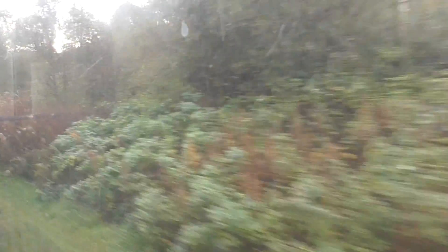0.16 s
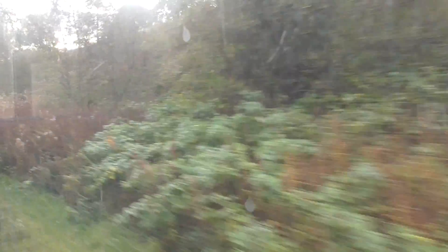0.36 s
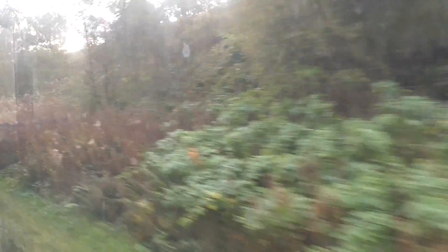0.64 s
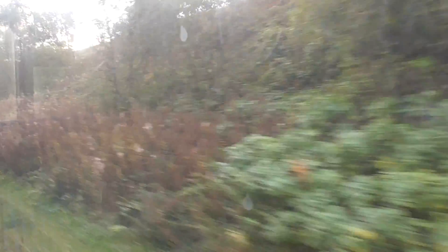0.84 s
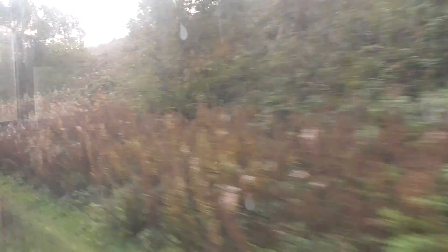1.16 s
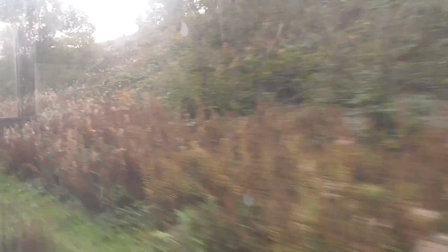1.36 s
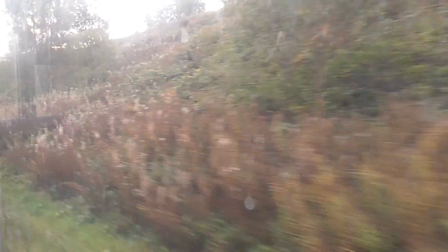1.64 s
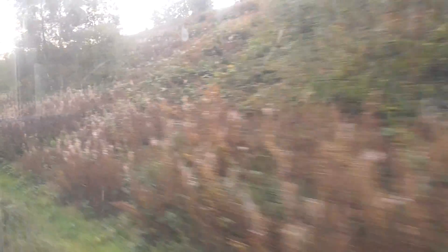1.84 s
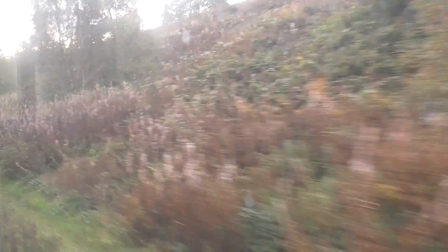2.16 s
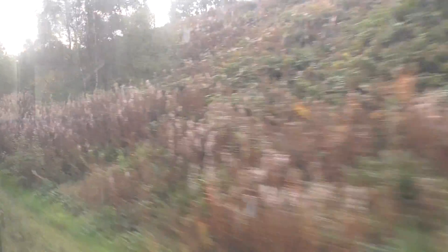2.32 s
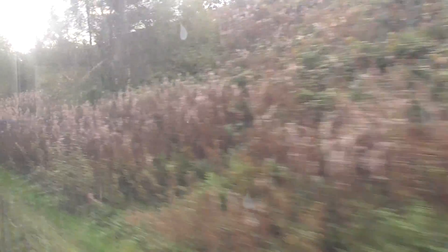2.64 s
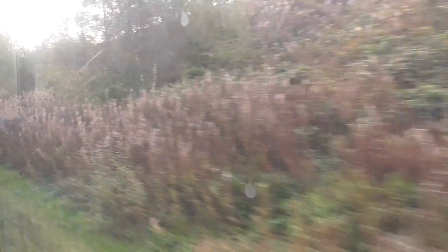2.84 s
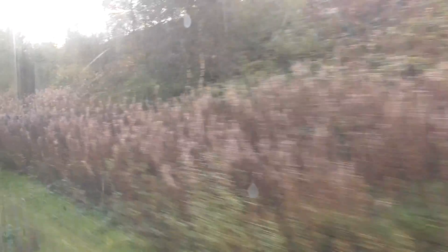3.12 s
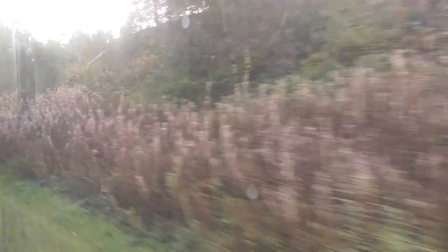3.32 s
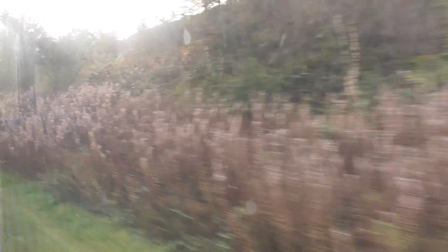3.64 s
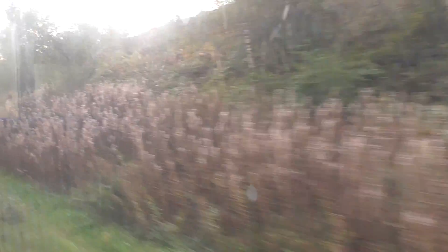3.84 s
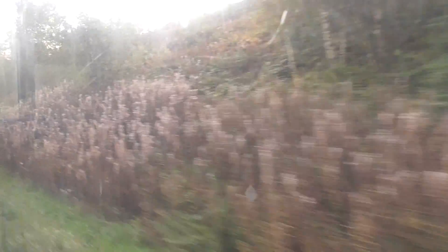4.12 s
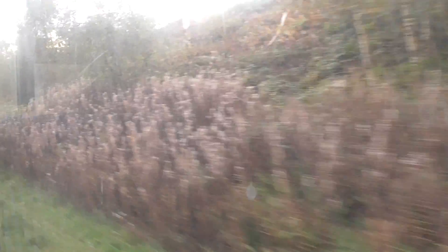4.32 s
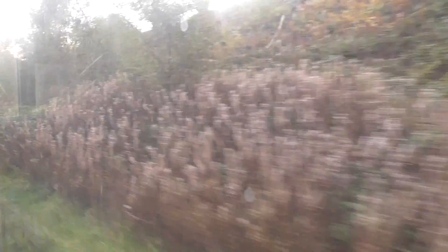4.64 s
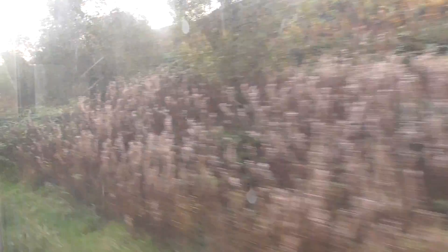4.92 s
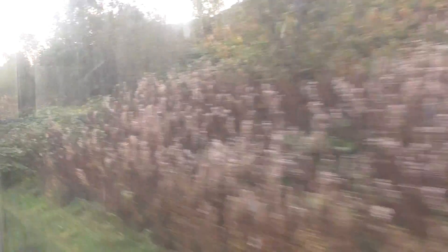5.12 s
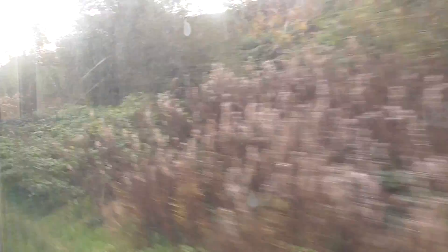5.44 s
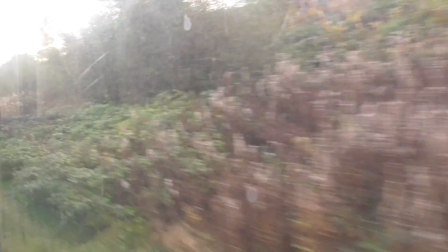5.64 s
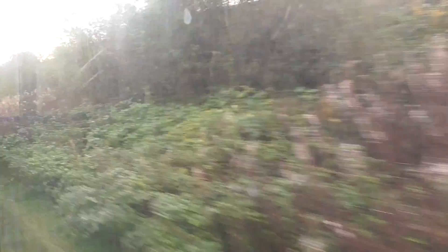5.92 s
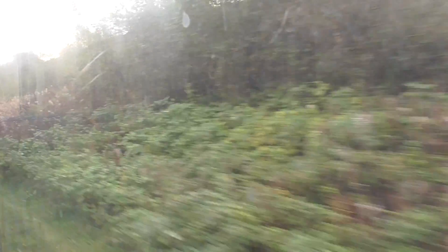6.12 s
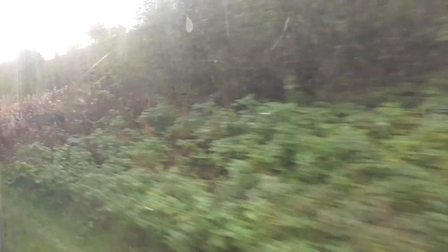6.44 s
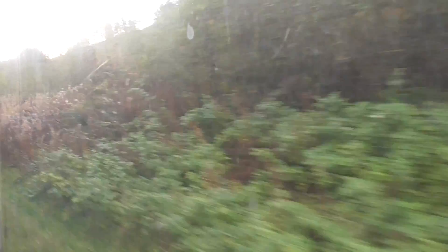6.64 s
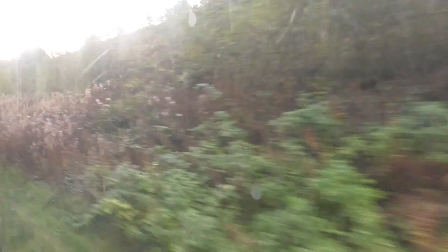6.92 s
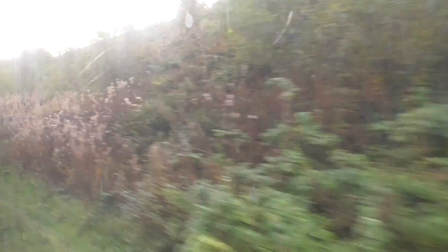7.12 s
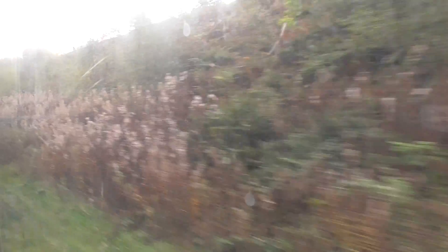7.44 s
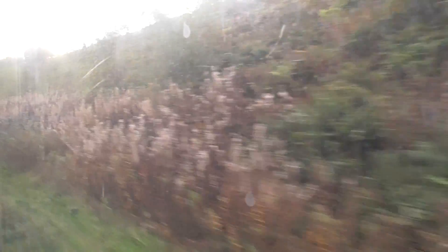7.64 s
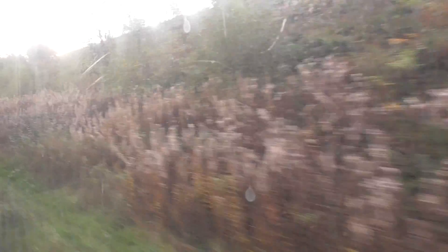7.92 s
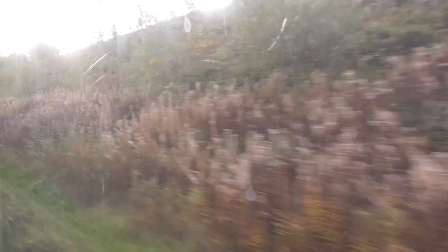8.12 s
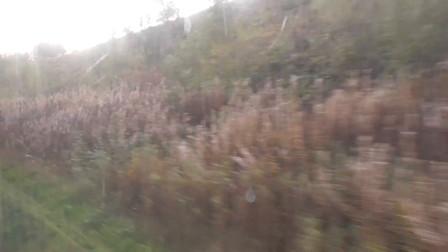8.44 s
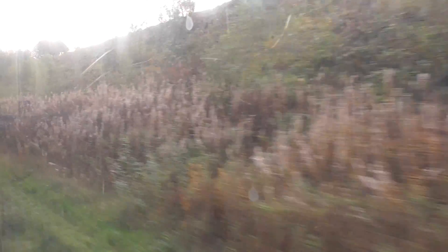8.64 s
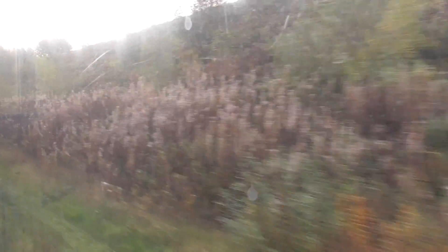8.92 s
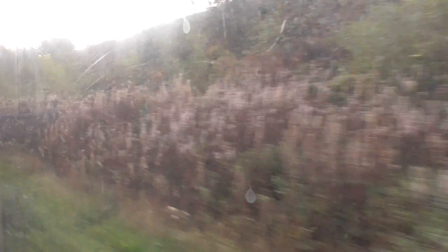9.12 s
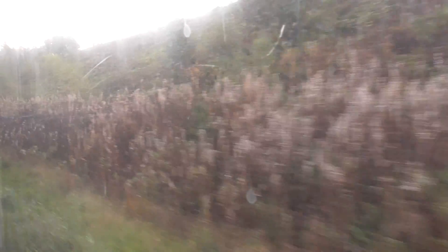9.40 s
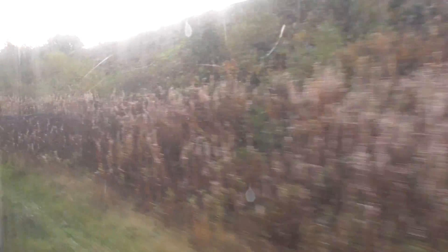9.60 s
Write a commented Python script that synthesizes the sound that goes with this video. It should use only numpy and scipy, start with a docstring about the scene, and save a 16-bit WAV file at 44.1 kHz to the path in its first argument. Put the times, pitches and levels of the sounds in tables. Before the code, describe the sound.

Heard from a window seat inside a diesel railcar at speed: a heavy, booming wheel rumble and throbbing engine drone continue throughout. About every one and a half seconds, two axles hit a rail joint with a quick double knock and soft floor thud. Loose wall trim rattles and ticks irregularly, with faint air hiss above. The microphone is close to the window panel, in a muffled, bass-heavy cabin.

```python
"""Window seat in a diesel railcar

Wheel noise booms through the resonances of the car body, over engine tones and a deep, swelling rumble.
The two axles of the bogie knock over rail joints and dips: each blow rings a set of fading tones.
Loose trim rattles, made of short noise bursts sent through panel resonances; a metal fitting jingles
twice and a few thin scratches are heard, both from high noise. Filtered noise gives the hiss of air."""
import sys
import numpy as np
from scipy import signal
from scipy.fft import rfft, irfft, next_fast_len
from scipy.io import wavfile
from scipy.ndimage import uniform_filter1d, minimum_filter1d

SR = 44100
rng = np.random.default_rng(int(sys.argv[2]) if len(sys.argv) > 2 else 0)


def store_wav(level_fs):
    """Save 16-bit WAV to argv[1]."""
    pcm = np.round(np.clip(np.atleast_2d(level_fs), -1, 1) * 32767)
    wavfile.write(sys.argv[1], SR, pcm.T.astype(np.int16))


N = 430857
TIME = np.arange(N) / SR
FREQS = np.arange(N // 2 + 1) * SR / N + 1e-3  # in Hz, just above zero so that it can be divided by


def undb(db):
    """Decibels to gain."""
    return 10 ** (np.asarray(db) / 20)


def unit(x):
    """Scale to an rms of 1."""
    return x / np.sqrt(np.mean(x ** 2))


def follow(points):
    """Draw a curve over time through (seconds, dB) points."""
    return np.interp(TIME, *np.transpose(points))


def colour(points):
    """Gain at every frequency from (Hz, dB) points."""
    hz, db = np.transpose(points)
    return undb(np.interp(np.log(FREQS), np.log(hz), db))


def shape(x, gain):
    """Filter a sound by a gain at every frequency."""
    length = x.shape[-1]
    size = next_fast_len(length + 8192, True)
    hz = np.arange(size // 2 + 1) * SR / size
    return irfft(rfft(x, size) * np.interp(hz, FREQS, gain), size)[..., :length]


def resonance(hz, width_hz):
    """Response of one damped resonance, 1 at its centre."""
    return 1 / (1 + 1j * (FREQS ** 2 - hz ** 2) / (FREQS * width_hz))


def walk(rate):
    """Bounded random drift with an rms of 1, taking this many new values per second."""
    steps = rng.uniform(-1, 1, 16384)
    return unit(np.interp(TIME * rate, np.arange(len(steps)), steps))


def add(track, s, sound):
    """Mix a short sound into the track at time s."""
    start = int(np.clip(s * SR, 0, N))
    part = sound[..., :N - start]
    track[..., start:start + part.shape[-1]] += part


# How wide the cabin sounds.
# Each row: frequency in Hz, level of the left-right difference against the middle in dB.
CABIN_WIDTH = [(30, -28), (120, -12), (280, -14), (600, -13), (1100, -9.5), (2200, -3), (4500, -7),
               (8000, -3), (10000, 3), (13000, -4)]


def stereo(pair, left_db):
    """Direct sound goes to both ears alike, diffuse sound with opposite signs; the bass stays nearly alike."""
    direct, diffuse = pair
    side = shape(diffuse, colour(CABIN_WIDTH))
    left = (direct + side) * undb(left_db / 2)
    right = (direct - side) * undb(-left_db / 2)
    return np.array([left, right])


# Tone colour of the air hiss. Each row: frequency in Hz, relative level in dB.
AIR_COLOUR = [(500, -29), (2000, -8.5), (3700, -1), (4800, -3), (5900, -8.5), (7700, -3.5), (9500, -9.5),
              (11300, -12.5), (13000, -19.5), (15500, -33)]
# How the hiss swells and thins. Each row: time in seconds, level in dB before the overall gain.
AIR_LEVEL = [(0, -56), (0.35, -56), (0.8, -56), (1.1, -54.5), (1.3, -59), (1.95, -57), (2.3, -54),
             (2.55, -57), (3.0, -56.5), (3.88, -56), (4.25, -60), (4.65, -55.5), (5.05, -58), (5.3, -54),
             (5.6, -58.5), (6.1, -58), (6.7, -58), (7.0, -57.5), (7.25, -56), (7.9, -59), (8.4, -56.5),
             (9.4, -57), (9.77, -59)]


def air(gain_db=4, flicker_db=1.74):
    """Air hisses along the window: coloured noise that swells, thins and flickers."""
    hiss = unit(shape(rng.standard_normal((2, N)), colour(AIR_COLOUR)))
    level_db = follow(AIR_LEVEL) + gain_db + flicker_db * walk(40)
    return stereo(hiss * undb(level_db), left_db=1.0)


# Slow heave of the carriage on its springs. Each row: time in seconds, level in dB before the overall gain.
SWAY_LEVEL = [(0, -61), (1.5, -49), (2.3, -48), (2.85, -41), (3.5, -44), (4.2, -48), (4.7, -43.5),
              (5.9, -58), (6.8, -59), (7.3, -44), (7.7, -46.5), (8.15, -43), (9.2, -44.5), (9.77, -51)]


def sway(gain_db=-2, centre_hz=16):
    """The carriage heaves on its springs with a deep rumble, alike on both sides."""
    heave = unit(shape(rng.standard_normal(N), abs(resonance(centre_hz, 12)) ** 2))
    return heave * undb(follow(SWAY_LEVEL) + gain_db)


def crank_turns(shaft_hz=19.9):
    """Count the turns of the crankshaft, whose speed drifts slightly."""
    return np.cumsum(shaft_hz * (1 + .003 * walk(2))) / SR


# Engine drone; six cylinders fire three times a turn.
# Each row: multiple of the crankshaft rate, rms level in dB around which it throbs.
ENGINE_ORDERS = [(2.5, -53), (3, -36.5), (3.5, -47), (8, -32)]
# Drive line hums. Each row: frequency in Hz and rms level in dB, both of which waver.
DRIVE_HUMS = [(98, -34), (206, -32.5)]


def engine(turns, throb_db=-3.5, hum_throb_db=-2.0, wander_hz=0.84):
    """Tones locked to the crankshaft drone and throb; the drive line hums waver in pitch and level."""
    drone = np.zeros(N)
    for order, db in ENGINE_ORDERS:
        level = undb(db + throb_db * walk(9))
        drone += level * np.sin(2 * np.pi * (order * turns + rng.random()))
    for hz, db in DRIVE_HUMS:
        cycles = np.cumsum(hz + wander_hz * walk(5)) / SR
        drone += undb(db + hum_throb_db * walk(6.1)) * np.sin(2 * np.pi * cycles)
    return np.sqrt(2) * drone  # a sine's peak is this much above its rms


# Thin, high scratches. Each row: start in seconds, relative level in dB.
SCRATCH_EVENTS = [(1.01, -43), (1.112, -44), (1.166, -46)]


def scratches(centre_hz=10000, width_hz=5500, grain_db=4, rise_s=.004, fade_s=.035):
    """Thin, high scratches: each a short spray of fine grains of uneven strength."""
    t = TIME[:SR // 4]
    swell = (1 - np.exp(-t / rise_s)) * np.exp(-t / fade_s)
    out = np.zeros((2, N))
    for s, db in SCRATCH_EVENTS:
        grains = rng.standard_normal((2, len(t))) * undb(grain_db * rng.exponential(size=len(t)))
        add(out, s, undb(db) * unit(grains) * swell)
    return stereo(shape(out, abs(resonance(centre_hz, width_hz)) ** 2), left_db=-1)


# Jingles of a loose metal fitting. Each row: start in seconds, level in dB, tilt in dB per octave.
JINGLE_EVENTS = [(4.655, -48, 3), (5.261, -51, 24)]
# Resonances of the fitting. Each row: frequency in Hz, width in Hz, relative level in dB before the tilt.
FITTING_MODES = [(6700, 130, 0), (7700, 110, -5), (8450, 170, -3), (9270, 230, -3), (10500, 200, -5)]


def jingles(rise_s=.012, fade_s=0.028):
    """A small metal fitting buzzes against its seat: noise through narrow, high resonances."""
    t = TIME[:SR // 4]
    metal = sum(undb(db) * abs(resonance(hz, width)) ** 2 for hz, width, db in FITTING_MODES)
    octaves = np.log2(FREQS / FITTING_MODES[0][0])
    swell = (1 - np.exp(-t / rise_s)) * np.exp(-t / fade_s)
    out = np.zeros((2, N))
    for s, db, tilt_db in JINGLE_EVENTS:
        ring = unit(shape(rng.standard_normal((2, len(t))), metal * undb(tilt_db * octaves)))
        add(out, s, undb(db) * ring * swell / swell.max())
    return stereo(out, left_db=0)


# Short swells of narrow-band noise in the rumble.
# Each row: middle of the swell in seconds, length in seconds, centre of the band in Hz, level in dB.
RUMBLE_SWELLS = [(0.225, 0.066, 314, -22), (0.258, 0.15, 219, -22.5), (0.56, 0.3, 192, -14),
                 (1.19, 0.12, 240, -12.5), (1.342, 0.25, 265, -13.5), (1.558, 0.1, 254, -17.5),
                 (1.81, 0.14, 247, -17.5), (2.0, 0.74, 396, -22), (2.046, 0.11, 257, -14.5),
                 (3.02, 0.28, 160, -18), (3.38, 0.21, 157, -16.5), (4.42, 0.072, 376, -20.5),
                 (4.86, 0.21, 208, -18.5), (5.24, 0.099, 143, -13), (6.73, 0.11, 146, -14.5),
                 (7.639, 0.11, 210, -12), (8.077, 0.54, 228, -19.5), (8.46, 0.13, 143, -19.5),
                 (9.115, .08, 332, -20), (9.14, 0.15, 216, -14), (9.656, 0.12, 232, -13)]


def rumble_swells(width_hz=96):
    """The rumble swells briefly in a narrow band: filtered noise that rises and falls once."""
    out = np.zeros((2, N))
    for s, length, hz, db in RUMBLE_SWELLS:
        swell = np.cos(np.pi * np.clip((TIME[:SR] - .5) / length, -.5, .5))
        band = abs(resonance(hz, width_hz)) ** 2
        rumble = shape(rng.standard_normal((2, SR)), band) * swell
        strength = np.sqrt(np.sum(rumble ** 2, axis=1, keepdims=True) / np.sum(swell ** 2))
        add(out, s - .5, undb(db) * rumble / strength)
    return stereo(out, left_db=0.0)


# Level of the body boom, with a few lulls. Each row: time in seconds, level in dB before surges and gain.
BOOM_LEVEL = [(0, -16.5), (0.58, -17.5), (0.79, -22), (0.95, -17.5), (1.4, -18.5), (2.0, -17.5),
              (2.3, -17.5), (2.62, -21.5), (2.82, -15.5), (3.5, -18), (4.1, -18), (4.4, -16), (5.3, -19.5),
              (5.92, -22), (6.2, -17.5), (7.3, -19.5), (7.7, -18), (8.9, -16.5), (9.77, -19.5)]


def boom_level(surge_db=1.5):
    """The boom follows its level curve and surges at random around it."""
    return follow(BOOM_LEVEL) + surge_db * walk(14)


def roar_level(roar_db=-24, rail_s=1.529):
    """The roar swells once per rail, where the head is worn before a joint, and sinks after the bogie."""
    wear_db, wear_lead_s = 0.5, 0.32
    lull_db, lull_after_s, lull_half_s = -2.5, 0.42, 0.036
    since_worn = TIME - RAIL_JOINTS[0][0] + wear_lead_s
    level_db = roar_db + wear_db * np.cos(2 * np.pi * since_worn / rail_s)
    for joint in RAIL_JOINTS:
        level_db = level_db + lull_db * np.exp(-((TIME - joint[0] - lull_after_s) / lull_half_s) ** 2)
    return level_db


# Rolling noise in the cabin before the body lifts it. Each row: frequency in Hz, relative level in dB.
ROLLING_COLOUR = [(20, -51.5), (36, -34), (50, -28), (68, -11), (110, -7.5), (150, -5.5), (250, -5),
                  (350, -9), (720, -18), (1050, -22), (1600, -34), (2700, -51), (6000, -66.5), (15500, -95)]
# Car body resonances. Each row: frequency in Hz, width in Hz, lift in dB (a cut if negative).
BODY_MODES = [(128.5, 20, 4), (146, 10.5, 6), (166, 23, 4), (181, 15, -1), (205.5, 14, 6.5),
              (221.7, 25.6, 5.5), (266.4, 12, 5), (411, 34, 5), (583, 150, 3), (695, 56, 4), (791, 27, 4.5),
              (980, 26, 1.5), (1030, 88, 2.5), (1352, 37, 3), (1913, 19, 6), (2310, 220, 3),
              (2740, 34, -0.5)]


def rolling(boom_db, roar_db, low_db=2.0, high_db=2.0, split_hz=310):
    """Rough rails shake the body, which booms at its resonances; the roar above flutters at random."""
    lift_db = sum(db * abs(resonance(hz, width)) ** 2 for hz, width, db in BODY_MODES)
    gain = colour(ROLLING_COLOUR) * undb(lift_db)
    low = 1 / (1 + (FREQS / split_hz) ** 8)  # share of the power that belongs to the boom
    boom = unit(shape(rng.standard_normal((2, N)), gain * np.sqrt(low)))
    roar = unit(shape(rng.standard_normal((2, N)), gain * np.sqrt(1 - low)))
    flutter_db = .9 * walk(45)
    boom_part = stereo(boom * undb(boom_db + low_db), left_db=-0.5)
    roar_part = stereo(roar * undb(roar_db + high_db + flutter_db), left_db=1.5)
    return boom_part + roar_part


LEAD_S = .005  # a contact starts to scrape this many seconds before its snap


def contact(snap_s, tail_db, tail_s, rise_s=0.0013):
    """A gritty snap that builds as the parts scrape, then a scatter of reflections: direct and diffuse parts."""
    t = TIME[:SR // 16] - LEAD_S
    after = np.maximum(t, 0)
    fade = np.exp(-after / snap_s) + undb(tail_db) * np.exp(-after / tail_s)
    swell = np.exp(np.minimum(t, 0) / rise_s) * fade
    burst = rng.standard_normal((2, len(t))) * swell
    return burst / np.sqrt(np.sum(burst[0] ** 2))


def toned(tap, tone_hz, lift_db=4.5, reach_octaves=0.24):
    """Where a tap lands decides which part of the panel's range speaks; the lift is evened out overall."""
    length = tap.shape[-1]
    hz = (np.arange(length // 2 + 1) + 1) * SR / length
    lift = undb(lift_db * np.exp(-(np.log2(hz / tone_hz) / reach_octaves) ** 2))
    in_range = (hz > 1200) & (hz < 5000)
    return irfft(rfft(tap) * lift, length) / np.sqrt(np.mean(lift[in_range] ** 2))


# How hard the loose trim shakes. Each row: time in seconds, relative level in dB.
TRIM_SHAKE = [(0, -33), (0.42, -43), (0.8, -57), (1.3, -46.5), (2.15, -41), (2.6, -43), (3.55, -40.5),
              (4.1, -55.5), (4.45, -43), (4.95, -53.5), (5.6, -40), (6.2, -42), (6.9, -61), (7.25, -38),
              (7.9, -46.5), (8.4, -43), (9.1, -42), (9.77, -42)]


def light_taps(loose_db, taps_per_s=10, centre_hz=2500, spread_octaves=0.74):
    """Random taps, stronger while the trim shakes hard: rows laid out like those of the loudest rattles."""
    above_shake_db, base_treble_db, scatter_db = 12, -15.5, 4
    chance = rng.uniform(-1, 1, (256, 4))
    times = (np.arange(len(chance)) + chance[:, 0] + 1) / taps_per_s
    taps = []
    for s, (_, size, bright, place) in zip(times, chance):
        if s < TIME[-1]:
            db = np.interp(s, TIME, loose_db) + above_shake_db + scatter_db * size
            treble_db = base_treble_db + scatter_db * bright
            taps.append((s, db, treble_db, centre_hz * 2 ** (spread_octaves * place)))
    return taps


# The loudest trim rattles. Each row: time of the snap in seconds, level in dB before the overall gain,
# treble in dB against that level before the edge gain, tone in Hz that is favoured.
LOUD_RATTLES = [(0.1627, -28, -14, 1930), (0.403, -22.5, -18, 2270), (0.63, -22.5, -23, 3360),
                (0.8866, -23, -15, 1700), (0.9921, -22.5, -11, 1540), (1.4516, -28.5, -24, 2350),
                (1.6622, -16, -13.5, 1540), (1.756, -26, -27, 1540), (1.8208, -24, -13, 2830),
                (1.906, -25.0, -15, 1990), (1.9606, -19.5, -21, 2260), (2.126, -26.5, -12, 3580),
                (2.1665, -25.5, -28, 1870), (2.4102, -19.5, -12, 1710), (2.4425, -25, -17, 3040),
                (2.648, -24.5, -22, 1870), (2.7462, -26, -14, 1540), (3.115, -14.5, -13, 3950),
                (3.2095, -22, -16, 1350), (3.4147, -22, -15, 2060), (3.4739, -21.5, -16, 1540),
                (3.5203, -20.5, -16, 2200), (3.62, -17.5, -13.5, 2200), (3.6845, -17.5, -23, 3360),
                (3.8824, -23.5, -16.5, 1530), (3.9097, -21.5, -18, 1990), (3.9474, -27, -15, 1540),
                (4.028, -15.5, -10, 3250), (4.1915, -22, -12, 3700), (4.2842, -24.5, -14, 1540),
                (4.391, -23, -22, 1540), (4.4262, -25.5, -17, 3700), (4.48, -27, -14, 1990),
                (5.3787, -23, -19, 3360), (5.4735, -29, -10, 1590), (5.5858, -19, -20, 1540),
                (5.881, -27, -11, 1930), (5.9821, -26, -30.5, 2270), (6.0242, -16.5, -10.5, 1560),
                (6.1822, -22, -15, 2060), (6.339, -23.0, -19, 1540), (7.2334, -16.5, -8.5, 3700),
                (7.3124, -27, -9, 2670), (7.335, -20.5, -21, 1540), (7.3698, -14.5, -11, 4080),
                (7.469, -26, -26.5, 2270), (7.567, -25.0, -13.5, 1700), (7.6274, -19.5, -9, 2200),
                (7.775, -23.5, -16, 2420), (8.285, -21, -13, 1990), (8.492, -26, -28, 2003),
                (8.5204, -24.5, -15, 1700), (8.8978, -19, -15, 2060), (9.0014, -22, -19, 2060),
                (9.0706, -27, -18.5, 2060), (9.1617, -28.5, 3, 1540), (9.213, -18, -8, 2270),
                (9.3138, -23, -23, 2350), (9.4577, -26.5, -21, 1930), (9.5166, -17.5, -12, 2270)]
# Resonances of the trim panel. Each row: frequency in Hz, width in Hz, relative level in dB.
TRIM_MODES = [(810, 470, 8.5), (1362, 167, 18), (1955, 130, 12.5), (2316, 150, 11), (2710, 98, 5.5),
              (3296, 310, 5.5), (3900, 250, 4), (4200, 350, 2), (4570, 160, 1), (4790, 190, -3),
              (5330, 200, -6.5), (7500, 910, -11)]
# Colour of the bright edge of a tap. Each row: frequency in Hz, relative level in dB.
EDGE_COLOUR = [(1500, -42.5), (4000, -8.5), (6000, 10.5), (8000, 15.5), (11500, 2), (13000, -3),
               (15500, -13)]


def trim(turns, loose_db, knocks, rattle_db=17.5, edge_db=6, chatter_db=21.0, scatter_db=7, jolt_db=-4,
         top_hz=12000):
    """Loose trim taps its frame, rebounds and settles, clatters at each knock and chatters with the engine."""
    tick_from_db, tick_db = -12, -15  # how bright a tap must be to tick, and the tick against the tap
    settle_s, settle_db = .02, -11  # faint tick after a loud rattle, against its bright edge
    rebound_s, rebound_db = .006, -13.5  # bounce after a loud rattle, against the rattle
    taps, edges = np.zeros((2, 2, N))
    for s, db, treble_db, tone_hz in LOUD_RATTLES + light_taps(loose_db):
        start = s - LEAD_S
        tap = toned(contact(snap_s=0.0029, tail_db=-13.5, tail_s=0.016), tone_hz)
        add(taps, start, tap * undb(db + rattle_db))
        edge = contact(snap_s=0.0037, tail_db=-21, tail_s=0.012, rise_s=.0008)
        add(edges, start, edge * undb(db + treble_db + edge_db))
        if treble_db > tick_from_db:
            tick = contact(snap_s=.0005, tail_db=-14, tail_s=0.006, rise_s=0.00018)
            add(edges, start, tick * undb(db + tick_db + edge_db))
    for s, db, treble_db, tone_hz in LOUD_RATTLES:
        settle = contact(snap_s=.002, tail_db=-20, tail_s=.008)
        settle = settle * undb(db + treble_db + edge_db + settle_db)
        add(edges, s - LEAD_S + settle_s * rng.uniform(.8, 1.2), settle)
        bounce = toned(contact(snap_s=.003, tail_db=-2.5, tail_s=0.028), tone_hz)
        bounce = bounce * undb(db + rattle_db + rebound_db)
        add(taps, s - LEAD_S + rebound_s * (.5 + rng.random()), bounce)
    for s, db, _ in knocks:
        add(taps, s, contact(snap_s=0.009, tail_db=-22, tail_s=0.022) * undb(db + jolt_db))
    # the panel chatters five times in each four-stroke cycle of two turns
    for i in np.flatnonzero(np.diff(np.floor(5 / 2 * turns))):
        tap = contact(snap_s=0.0028, tail_db=-27.5, tail_s=.007, rise_s=.0018)
        late, size = rng.uniform(-1.1, 1, 2)
        add(taps, TIME[i] + 0.0058 * late, tap * undb(loose_db[i] + chatter_db + scatter_db * size))
    # neighbouring resonances have opposite signs
    panel = sum(undb(db) * resonance(hz, width) * (-1) ** k for k, (hz, width, db) in enumerate(TRIM_MODES))
    panel = panel / (1 + (FREQS / top_hz) ** 8)
    return stereo(shape(taps, panel) + shape(edges, colour(EDGE_COLOUR)), left_db=2.0)


# Rail joints. Each row: time under the first axle in seconds, knock levels of the first and second axle
# in relative dB, tones of those two knocks in Hz, then level in relative dB and tone in Hz
# of the floor thud under the second axle.
RAIL_JOINTS = [(0.664, -4.5, -8, 590, 626, -5, 235), (2.197, -6.5, -7.5, 440, 613, -1, 240),
               (3.727, -5.5, -6, 790, 550, -5.5, 238), (5.257, -5.5, -5, 706, 480, -2.5, 288),
               (6.783, -3.5, -4, 604, 600, -3, 232), (8.306, -3.5, -8, 775, 483, 0, 275)]
# Dips in the rail head. Each row: time under the first axle in seconds, thud levels of the first and
# second axle in relative dB, knock levels of the first and second axle in relative dB, knock tone in Hz.
RAIL_DIPS = [(4.655, -8, -22, -11, -11, 650), (5.367, -7.5, -12, -11, -11, 500),
             (5.584, -15, -0.5, -31, -17.5, 445), (6.297, -2, -4, -9.5, -8.5, 480)]


def axles(gap_s=.2125, dip_thud_hz=247):
    """Both axles cross each joint and dip in turn: rows (s, dB, tone Hz) of bogie knocks and of floor thuds."""
    knocks, thuds = [], []
    for s, first_db, second_db, first_hz, second_hz, thud_db, thud_hz in RAIL_JOINTS:
        knocks += [(s, first_db, first_hz), (s + gap_s, second_db, second_hz)]
        thuds += [(s + gap_s, thud_db, thud_hz)]
    for s, first_db, second_db, first_knock_db, second_knock_db, knock_hz in RAIL_DIPS:
        thuds += [(s, first_db, dip_thud_hz), (s + gap_s, second_db, dip_thud_hz)]
        knocks += [(s, first_knock_db, knock_hz), (s + gap_s, second_knock_db, knock_hz)]
    return knocks, thuds


def blows(events, modes, push_s, tail_db, tail_s, low_hz=90):
    """Each blow rings the modes, most of all near its tone; a rough after-shake spreads through the body."""
    tone_lift_db, tone_reach_octaves = 5, 0.14
    t = TIME[:SR // 4]
    out = np.zeros((2, N))
    for s, db, tone_hz in events:
        ring = np.zeros(len(t))
        for hz, mode_db, t60 in modes:
            lift_db = tone_lift_db * np.exp(-(np.log2(hz / tone_hz) / tone_reach_octaves) ** 2)
            struck_hz = hz * (1 + 0.029 * rng.standard_normal())  # a little different at each blow
            ring += undb(mode_db + lift_db - 60 * t / t60) * np.sin(2 * np.pi * (struck_hz * t + rng.random()))
        ring *= 1 - np.exp(-t / push_s)  # soft onset
        force = rng.standard_normal((2, len(t))) * undb(tail_db) * np.exp(-t / tail_s)
        force[0, 0] += 1  # the blow itself
        hit = signal.fftconvolve(force, ring[None], axes=1)
        strength = np.sqrt(2 * np.mean(hit[0, :SR // 64] ** 2))
        add(out, s, hit * undb(db) / strength)
    return stereo(shape(out, 1 / (1 + (low_hz / FREQS) ** 4)), left_db=1.0)


# Floor tones. Each row: frequency in Hz, relative level in dB, seconds to fade by 60 dB.
FLOOR_MODES = [(205, -2, 0.049), (230, 1.5, 0.084), (244.5, 8, 0.03), (280, 8, 0.06), (332, -6, 0.033)]


def floor_thuds(thuds):
    """The floor gives way softly under an axle and thuds with its low modes."""
    return undb(-0.5) * blows(thuds, FLOOR_MODES, push_s=0.0047, tail_db=-35, tail_s=0.008)


# Tones of a struck wheel and bogie. Each row: frequency in Hz, relative level in dB, seconds to fade by 60 dB.
BOGIE_MODES = [(311, -13, 0.12), (437, -8.5, 0.081), (502, -5, 0.046), (589, -5.5, 0.041), (638, -15, 0.13),
               (656, 4.5, 0.013), (764, -7, 0.047), (890, 2, 0.005), (945, -15, 0.033),
               (1380, -18.5, 0.018), (1730, -26, 0.029)]


def bogie_knocks(knocks):
    """A struck wheel and bogie ring briefly with their higher modes."""
    return undb(-3.5) * blows(knocks, BOGIE_MODES, push_s=0.0015, tail_db=-30.5, tail_s=0.029)


def scene():
    """Everything as it reaches the window seat."""
    boom_db, roar_db = boom_level(), roar_level()
    loose_db = follow(TRIM_SHAKE)
    turns = crank_turns()
    knocks, thuds = axles()
    joint_thuds = thuds[:len(RAIL_JOINTS)]
    track = bogie_knocks(knocks) + floor_thuds(thuds)
    track = track + rolling(boom_db, roar_db) + rumble_swells() + sway() + engine(turns)
    return track + trim(turns, loose_db, knocks + joint_thuds) + jingles() + scratches() + air()


def record(dry, top_hz=15800):
    """A fast limiter holds down the loudest peaks; what it lets through is clipped; the top is cut."""
    size, ceiling = 256, 1.04  # limiter window in samples, limit as an amplitude
    room = minimum_filter1d(1 / np.maximum(abs(dry).max(axis=0) / ceiling, 1), size)
    held = np.clip(dry * uniform_filter1d(room, size), -1, 1)
    return signal.sosfilt(signal.ellip(8, .2, 70, top_hz, fs=SR, output="sos"), held)


dry = scene()
out = record(dry)
store_wav(out)
```